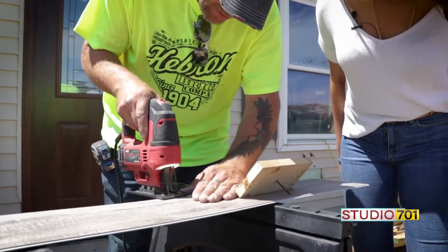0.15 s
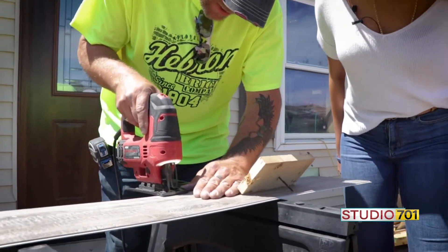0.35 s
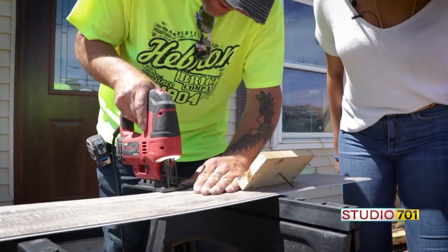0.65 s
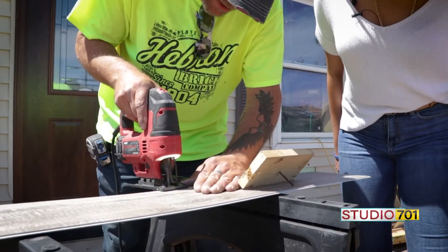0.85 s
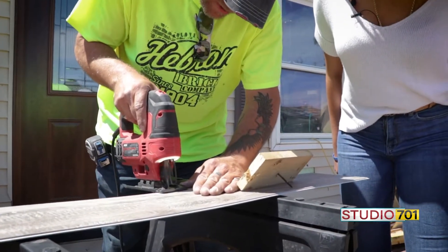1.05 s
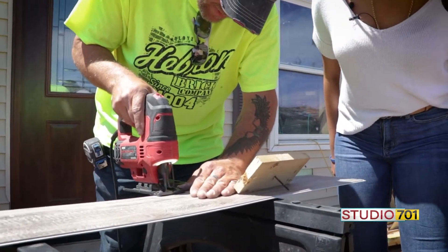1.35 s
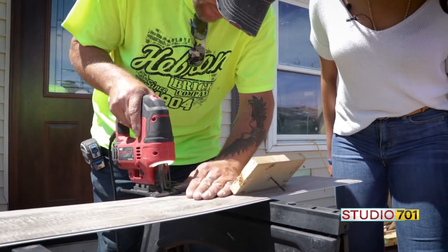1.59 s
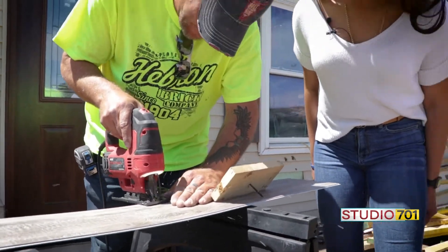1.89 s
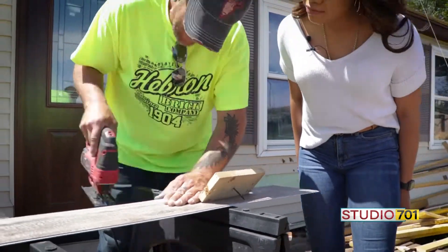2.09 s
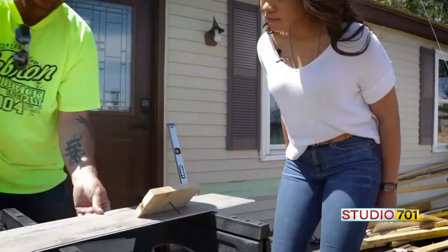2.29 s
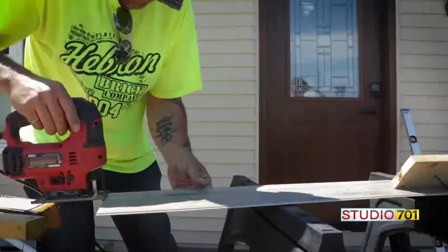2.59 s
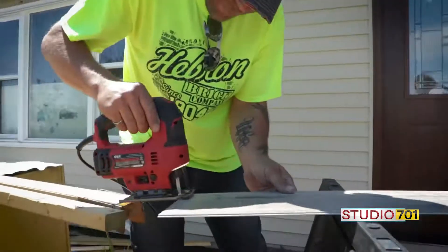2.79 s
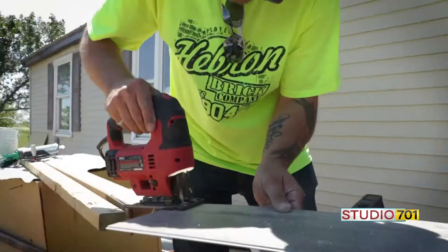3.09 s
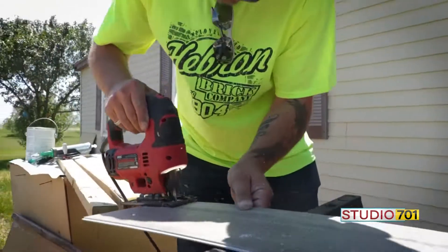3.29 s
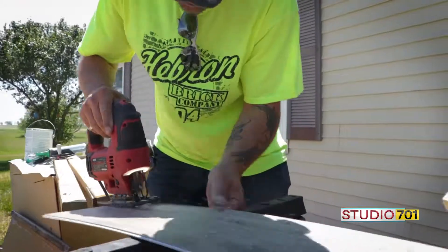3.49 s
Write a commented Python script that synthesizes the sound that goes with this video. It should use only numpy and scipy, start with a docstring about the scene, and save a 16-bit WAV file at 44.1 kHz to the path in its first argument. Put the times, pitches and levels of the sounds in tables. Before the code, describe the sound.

Jigsaw cutting flooring outdoors with a harsh buzzing rattle, a brief stop, then a whining restart

```python
"""A jigsaw rattles up to speed through a vinyl plank outdoors: knocks and rasp are shaped noise, with gear tones.
Abruptly it is heard running light, sine partials whining over throbbing fan noise, then braking with whistles.
Saw and plank are shifted about in noise bursts: dull knocks, gritty scrapes and sharp ticks.
The motor starts again, the blade catches the edge with a snap, and the plank knocks on its trestles.
Everything is close and mono over faint outdoor air."""
import sys
import numpy as np
from scipy import signal
from scipy.fft import rfft, irfft, next_fast_len
from scipy.io import wavfile
from scipy.ndimage import uniform_filter1d, map_coordinates

SR = 44100
rng = np.random.default_rng(int(sys.argv[2]) if len(sys.argv) > 2 else 0)


def wav_out(sig):
    """Save sig, one row per channel (or a flat mono array), as 16-bit PCM at SR to the path in sys.argv[1]."""
    wavfile.write(sys.argv[1], SR, np.round(np.clip(np.atleast_2d(sig).T, -1, 1) * 32767).astype(np.int16))


N = 160965
CUT_END_S = 1.77


def undb(db):
    """Decibels to gain."""
    return 10 ** (np.asarray(db) / 20)


def unit(x):
    """Scale to rms 1."""
    return x / np.sqrt(np.mean(x ** 2) + 1e-20)


def times():
    """Time of every sample in seconds."""
    return np.arange(N) / SR


def curve(table, axis=1):
    """One column of a table joined by straight lines in time."""
    rows = np.array(table, float)
    return np.interp(times(), rows[:, 0], rows[:, axis])


def noise():
    """White noise of rms 1."""
    return rng.standard_normal(N)


def walk(rate):
    """Smooth random drift of rms 1 that changes about rate times a second."""
    hold = max(int(SR / rate), 1)
    steps = np.repeat(noise()[:N // hold + 1], hold)
    smooth = uniform_filter1d(uniform_filter1d(steps, hold), hold // 2 + 1)
    return unit(smooth[:N])


def colour(x, points):
    """Minimum-phase filter with the given spectrum; white noise keeps its level."""
    rows, size = np.array(points, float), next_fast_len(N + 8192)
    hz = np.maximum(np.arange(size // 2 + 1) * SR / size, 1)
    gain = unit(undb(np.interp(np.log(hz), np.log(rows[:, 0]), rows[:, 1])))
    # folding the cepstrum onto positive time makes the filter causal
    cepstrum = irfft(np.log(gain), size)
    cepstrum[1:size // 2] *= 2
    cepstrum[size // 2 + 1:] = 0
    return irfft(rfft(x, size) * np.exp(rfft(cepstrum)), size)[:N]


def ring(x, hz, width_hz):
    """One resonance."""
    return signal.lfilter(*signal.iirpeak(hz, hz / width_hz, SR), x)


def swell(at_s, width_s, limit):
    """Bell-shaped rise and fall around one moment, with its exponent capped at limit."""
    return np.exp(-np.minimum(((times() - at_s) / width_s) ** 2, limit))


def turning(speed, wobble):
    """Turns made by the motor, whose speed wobbles slightly."""
    return np.cumsum(curve(speed) * (1 + wobble * walk(120))) / SR


def texture(cycles, repeat, size):
    """Contact noise, of which a share of the power comes back the same in every cycle."""
    same = map_coordinates(rng.standard_normal(size), [cycles % 1 * size], order=3, mode="grid-wrap")
    share = np.clip(repeat, 0, 1)
    return np.sqrt(share) * same + np.sqrt(1 - share) * noise()


def whine(turns, orders, flutter_db, blur):
    """Partials of a turning part, each fluttering on its own; the high ones are more blurred."""
    out = 0
    for order, db in orders:
        phase = order * turns + blur * order * walk(200) + rng.random()
        out = out + undb(db + flutter_db * walk(24.94)) * np.sin(2 * np.pi * phase)
    return unit(out)


def blows(table, decay_s):
    """Sudden onsets that die away exponentially."""
    t, out = times(), 0
    for at_s, db in table:
        out = out + undb(db) * (t >= at_s) * np.exp(-np.clip((t - at_s) / decay_s, 0, 20))
    return out


# Knocks of the plunger within one stroke: place (0-1 of a stroke), level_db (relative)
STROKE_KNOCKS = [(0.128, -4), (.31, -3.5), (.47, -10.5), (.63, -4), (0.769, -12.5), (0.981, -5)]
KNOCK_DECAY_S, KNOCK_SCATTER_DB = 0.00094, 1.3


def plunger_force(strokes, stroke_hz):
    """The plunger knocks several times a stroke, a little harder or softer each time."""
    force = 0.24  # steady contact between knocks
    for place, db in STROKE_KNOCKS:
        cycle = strokes - place + 2
        scatter = undb(db + KNOCK_SCATTER_DB * noise()[cycle.astype(int)])  # one draw a stroke
        since_s = (cycle % 1) / stroke_hz
        force = force + scatter * np.exp(-since_s / KNOCK_DECAY_S)
    return force


# Saw body spectrum: freq_hz, density_db (relative, per Hz)
BODY_COLOUR = [(30, -61), (70, -39), (100, -38), (140, -45), (300, -36), (500, -25), (720, -21),
               (1100, -32), (1220, -8), (1380, -9.5), (1580, -3), (2100, 0.5), (2550, -2.5), (2800, -0.5),
               (3150, 3), (3600, -1.5), (4200, -11.5), (8000, -33), (16000, -65)]


def body_rattle(force, strokes):
    """The knocks excite the saw body with noise that partly repeats each stroke."""
    return unit(colour(force * texture(strokes, repeat=0.36, size=800), BODY_COLOUR))


# Blade rasp spectrum: freq_hz, density_db (relative, per Hz)
RASP_COLOUR = [(200, -61.5), (1500, -5.5), (3500, -10.5), (4050, -7.5), (4450, -2), (4750, -2),
               (5200, -0.5), (5800, -5), (6300, -0.5), (7250, -4.5), (7750, 3.5), (8100, 2), (8600, -1.5),
               (9200, 1.5), (9900, -2), (10700, 2), (11300, -0.5), (12200, -4.5), (12800, -4.5),
               (14000, -11), (16000, -18)]


def blade_rasp(force, strokes):
    """The teeth rasp unevenly, less dependent on the knocks than the body is."""
    grit = undb(2 * walk(3000))  # 2 dB unevenness
    return unit(colour((force + 1.1) * grit * texture(strokes, repeat=0.15, size=840), RASP_COLOUR))


# Ringing of shoe and plank: freq_hz, half_width_hz (half the band of each filter), level_db (relative)
SHOE_MODES = [(779.4, 52.4, 1), (825, 51, 0), (899.6, 46, 1)]


def shoe_ringing(force, strokes):
    """The knocks ring shoe and plank, each mode a pair of resonances, with alternating sign."""
    push = force * texture(strokes, repeat=0.12, size=800)
    out = 0
    for k, (hz, half_width, db) in enumerate(SHOE_MODES):
        once = ring(push, hz, 2 * half_width)
        out = out + (-1) ** k * undb(db) * ring(once, hz, 2 * half_width)
    return unit(out)


# Gear whine in the cut: time_s, level_db
GEAR_LEVEL = [(0, -44.5), (.04, -52), (.1, -44.5), (.14, -37.5), (.19, -37.5), (.26, -40), (.36, -44),
              (.48, -42.5), (.6, -54), (1.77, -52)]
PINION_TEETH, GEAR_THROB, GEAR_BLUR_CYCLES = 5, .85, 0.14


def gear_whine(turns, strokes):
    """Pinion teeth mesh into a tone that throbs with the load, over a faint rotor hum."""
    load = 1 + GEAR_THROB * np.cos(4 * np.pi * strokes)  # heavier on each up and down stroke
    mesh = unit(load * np.sin(2 * np.pi * (PINION_TEETH * turns + GEAR_BLUR_CYCLES * walk(170))))
    hum = undb(-26) * np.sin(2 * np.pi * (turns + 0.14 * walk(60)))
    return (mesh + hum) * undb(curve(GEAR_LEVEL))


# Plunger buzz partials: order (multiple of the stroke rate), level_db (relative)
BUZZ_ORDERS = [(41, -0.5), (47, 0), (50, 1), (51, 0.5), (52, -2.5), (53, -1.5), (54, 1), (55, 1.5),
               (57, -4), (59, 0)]
# Build-up of the buzz: time_s, level_db
BUZZ_LEVEL = [(0, -80), (.45, -59), (.75, -43), (1.3, -41.5), (1.77, -39.5)]


def plunger_buzz(strokes):
    """High partials of the stroke rate build up at full speed."""
    return whine(strokes, BUZZ_ORDERS, flutter_db=2.5, blur=0.0013) * undb(curve(BUZZ_LEVEL))


# Motor speed while cutting: time_s, speed_turns_per_s
CUT_SPEED = [(0, 290), (.03, 283), (.07, 359), (.13, 406), (.22, 437), (.34, 482), (.5, 488), (.9, 490),
             (1.3, 494), (1.77, 492)]
# Mix of the cut: time_s, rattle_db, rasp_db, shoe_db
CUT_LEVEL = [(0, -42.5, -56.5, -54), (.05, -41.5, -48, -55.5), (.11, -40.5, -45, -51),
             (.2, -39.5, -41.5, -49), (.4, -36.5, -39, -49.5), (.58, -36, -37.5, -49), (.64, -36, -39, -51),
             (.8, -36, -37.5, -49), (1.3, -37, -36.5, -50.5), (1.77, -37, -36.5, -48.5)]
GEAR_RATIO = 9.4  # motor turns per stroke


def cutting():
    """The geared motor drives the plunger: rattle, rasp, ringing, gear whine and buzz stop together."""
    turns = turning(CUT_SPEED, wobble=.002)
    strokes, stroke_hz = turns / GEAR_RATIO, curve(CUT_SPEED) / GEAR_RATIO
    force = plunger_force(strokes, stroke_hz)
    saw = body_rattle(force, strokes) * undb(curve(CUT_LEVEL))
    saw = saw + blade_rasp(force, strokes) * undb(curve(CUT_LEVEL, axis=2))
    saw = saw + shoe_ringing(force, strokes) * undb(curve(CUT_LEVEL, axis=3))
    saw = saw + gear_whine(turns, strokes) + plunger_buzz(strokes)
    return saw * (times() < CUT_END_S)


# Outdoor air spectrum: freq_hz, density_db (relative, per Hz)
AIR_COLOUR = [(30, -25), (100, -22), (220, 1), (700, 3.5), (1500, -1), (4000, -1), (16000, -5)]


def outdoor_air():
    """A faint, steady bed of coloured noise."""
    return undb(-74) * colour(noise(), AIR_COLOUR)


def fan(turns, spectrum, throb, grit_db):
    """Hiss of fan and brushes that throbs once a turn."""
    pulse = 1 + throb * np.sin(2 * np.pi * turns)
    return colour(unit(noise() * pulse * undb(grit_db * walk(2500))), spectrum)


# Motor speed running light: time_s, speed_turns_per_s
LIGHT_SPEED = [(1.77, 523), (1.83, 522.5), (1.88, 519), (1.94, 513), (2.0, 513.3), (2.085, 514),
               (2.12, 420), (2.18, 286), (2.2, 260), (2.25, 172), (2.38, 20)]
# Fan spectrum running light: freq_hz, density_db (relative, per Hz)
LIGHT_FAN = [(60, -55), (250, -35), (1400, -29.5), (2500, -17), (4000, -10.5), (6000, -6), (7500, -1.5),
             (8800, -3.5), (10500, -4.5), (13000, -1.5), (16000, -5)]
# Motor partials running light: order (multiple of the turn rate), level_db (relative)
LIGHT_ORDERS = [(1, -30.5), (2, -18.5), (3, -26), (4, -13.5), (5, -13), (6, -11.5), (7, -10.5), (8, -8),
                (9, -10), (10, -9), (11, -5), (13, -1.5), (14, 1), (15, 4.5), (16, 1), (17, 3.5),
                (19, -0.5), (20, -3), (21, 2.5), (22, -9), (23, -2), (24, -6), (25, -3), (26, -4), (27, 0),
                (28, -3), (29, -3), (30, -2)]
# Mix running light: time_s, fan_db, whine_db
LIGHT_LEVEL = [(1.77, -38.5, -41), (1.86, -37.5, -39.5), (2.0, -36, -39), (2.08, -37, -37.5),
               (2.11, -39, -44), (2.15, -45, -77), (2.25, -52, -76), (2.35, -59.5, -93), (2.385, -80, -110)]
MOTOR_STOP_S = 2.39


def running_light():
    """The unloaded motor whines over its fan, then brakes to a stop with falling whistles."""
    t, turns = times(), turning(LIGHT_SPEED, wobble=0.00074)
    hiss = fan(turns, LIGHT_FAN, throb=.1, grit_db=2.0) * undb(curve(LIGHT_LEVEL))
    tone = whine(turns, LIGHT_ORDERS, flutter_db=2.0, blur=.001) * undb(curve(LIGHT_LEVEL, axis=2))
    motor = hiss + tone + singing(turns) + brake_whistles(curve(LIGHT_SPEED))
    return motor * (t >= CUT_END_S) * (t < MOTOR_STOP_S)


# Blade singing on single motor partials: peak_s, width_s, order (multiple of the turn rate), level_db
SINGING = [(1.99, .075, 5, -52), (1.99, .085, 8, -52), (2.86, .1, 1, -78), (3.04, .1, 5, -51),
           (3.0, .05, 3, -64), (3.33, .06, 12, -51), (3.345, .05, 13, -46), (3.33, .06, 14, -52),
           (3.39, .07, 8, -53), (3.44, .07, 9, -54)]


def singing(turns):
    """Single motor partials swell where the blade resonates."""
    out = 0
    for at_s, width_s, order, db in SINGING:
        tone = np.sqrt(2) * np.sin(2 * np.pi * round(order) * turns)  # rms 1
        out = out + undb(db) * swell(at_s, width_s, limit=30) * tone
    return out


# Braking whistles: order (multiple of the turn rate), roughness (fraction of pitch),
# peak_s, width_s, level_db (peak)
BRAKE_WHISTLES = [(5.4, .02, 2.105, .014, -54), (10, .025, 2.125, .055, -57), (50, .028, 2.19, .022, -49.5),
                  (50, .035, 2.25, .03, -58)]


def brake_whistles(speed):
    """Rough tones follow the falling motor speed."""
    out = 0
    for order, rough, at_s, width_s, db in BRAKE_WHISTLES:
        phase = np.cumsum(order * speed * (1 + rough * walk(1200))) / SR
        audible = order * speed < SR / 2  # mute above half the sample rate
        out = out + undb(db) * swell(at_s, width_s, limit=30) * np.sin(2 * np.pi * phase) * audible
    return out


# Dull knocks of the plank: start_s, level_db (at onset, before colouring)
PLANK_KNOCKS = [(2.262, -60), (2.433, -57), (2.446, -61), (2.481, -54), (2.558, -57.5), (2.615, -62.5),
                (2.666, -64.5), (3.076, -50.5), (3.208, -48.5), (3.245, -48), (3.286, -54), (3.318, -44),
                (3.352, -50), (3.377, -47), (3.389, -48), (3.436, -56), (3.514, -49), (3.53, -55),
                (3.588, -49.5), (3.599, -46)]
# Plank spectrum: freq_hz, density_db (relative, per Hz)
PLANK_COLOUR = [(40, -40), (130, -18), (300, -4), (500, 0.5), (1000, -1.5), (1500, -7.5), (2500, -30),
                (8000, -65)]


def plank_knocks():
    """Dull noise bursts with a short thud and a softer, longer tail."""
    thud = blows(PLANK_KNOCKS, decay_s=0.002)
    tail = undb(-13.5) * blows(PLANK_KNOCKS, decay_s=0.02)
    return colour((thud + tail) * noise(), PLANK_COLOUR)


# Scrapes of shoe and blade on the plank: peak_s, width_s, body_db, treble_db
SCRAPES = [(2.326, 0.0057, -55.5, -75), (2.348, 0.014, -52.5, -61), (2.422, 0.0043, -55.5, -53.5),
           (2.436, 0.0054, -60, -63), (2.447, 0.0061, -55, -63), (2.487, 0.0076, -64, -68),
           (2.565, 0.016, -53, -48.5), (2.975, 0.011, -42.5, -40), (3.0, 0.0085, -41.5, -39),
           (3.075, 0.013, -47, -57), (3.102, 0.0064, -47.5, -54), (3.42, 0.0057, -49, -39),
           (3.538, .007, -50.5, -39.5)]
# Scrape body spectrum: freq_hz, density_db (relative, per Hz)
SCRAPE_BODY = [(100, -52), (500, -14), (1000, -9.5), (1500, -2), (3500, 3.5), (5500, -2), (9000, -17),
               (16000, -35)]
# Scrape treble spectrum: freq_hz, density_db (relative, per Hz)
SCRAPE_TREBLE = [(300, -37), (2500, -20), (5000, -3), (8000, 3.5), (12000, -3.5), (16000, -7)]


def scraping(grit_db):
    """Short gritty rubs of noise, each with its own share of treble."""
    body, treble = 0, 0
    for at_s, width_s, body_db, treble_db in SCRAPES:
        rub = swell(at_s, width_s, limit=20)
        body = body + undb(body_db) * rub
        treble = treble + undb(treble_db) * rub
    grit = unit(undb(grit_db * walk(1200)))
    return colour(body * grit * noise(), SCRAPE_BODY) + colour(treble * grit * noise(), SCRAPE_TREBLE)


# Sharp ticks of the trigger and blade: start_s, level_db (at onset, before colouring)
TICKS = [(2.3462, -52), (2.394, -49), (2.4885, -49), (2.517, -63), (2.6345, -50.5), (2.680, -52.5),
         (2.754, -39), (2.882, -41), (2.9705, -28), (2.974, -20), (2.9762, -30)]
# Tick spectrum: freq_hz, density_db (relative, per Hz)
TICK_COLOUR = [(100, -53), (1500, -16), (2800, 0.5), (5000, -3), (8000, -1), (16000, -3)]
SNAP_S, SNAP_DB = 2.9762, -7  # impulse peak before colouring


def ticks_and_snap():
    """Brief noise bursts tick; a one-sample impulse is a tooth snapping against the edge."""
    snap = undb(SNAP_DB) * (np.arange(N) == int(SNAP_S * SR))
    return colour(blows(TICKS, decay_s=0.00085) * noise() + snap, TICK_COLOUR)


# Motor speed after the restart: time_s, speed_turns_per_s
RESTART_SPEED = [(2.753, 250), (2.775, 408), (2.8, 482.5), (2.842, 512.3), (2.898, 526.7), (3.004, 513),
                 (3.25, 508.8), (3.518, 510.8), (3.538, 498), (3.56, 516), (3.65, 509)]
# Fan spectrum after the restart: freq_hz, density_db (relative, per Hz)
RESTART_FAN = [(60, -62), (250, -39), (1000, -26.5), (1800, -18), (3000, -6), (5000, -3), (7500, 1),
               (11000, 1.5), (16000, -0.5)]
# Motor partials after the restart: order (multiple of the turn rate), level_db (relative)
RESTART_ORDERS = [(1, -18.5), (2, -12.5), (3, -14), (4, -12), (5, 0.5), (6, -6.5), (7, -4.5), (8, -1.5),
                  (9, -8.5), (10, 2), (11, -4), (12, -6), (13, -5), (14, -6), (15, -4), (16, -10), (17, -6),
                  (18, 2), (19, -9), (20, -6), (21, -7), (22, -4), (23, -12), (24, -9), (25, -5), (26, -7),
                  (27, 2), (28, -9), (29, 4.5), (30, -4)]
# Mix after the restart: time_s, fan_db, whine_db
RESTART_LEVEL = [(2.753, -48.5, -84), (2.785, -44, -79), (2.87, -41.5, -53.5), (2.96, -43, -45.5),
                 (3.05, -41.5, -46), (3.24, -42, -42.5), (3.41, -39.5, -43.5), (3.5, -41, -44.5),
                 (3.53, -42, -51), (3.58, -43, -46), (3.65, -41.5, -52)]
RESTART_S, RESTART_ATTACK_S = 2.747, 0.011


def restart():
    """The motor spins up again and the blade sings as it nears the plank."""
    turns = turning(RESTART_SPEED, wobble=.001)
    hiss = fan(turns, RESTART_FAN, throb=0.11, grit_db=1.5) * undb(curve(RESTART_LEVEL))
    tone = whine(turns, RESTART_ORDERS, flutter_db=2.5, blur=.0015) * undb(curve(RESTART_LEVEL, axis=2))
    fade_in = np.clip((times() - RESTART_S) / RESTART_ATTACK_S, 0, 1)
    return (hiss + tone + singing(turns)) * fade_in


def scene():
    """Saw, plank and faint outdoor air, the same in both channels."""
    mono = cutting() + outdoor_air() + running_light()
    mono = mono + plank_knocks() + scraping(grit_db=3) + ticks_and_snap() + restart()
    return np.array([mono, mono])


def record(dry):
    """The recorder cuts the top steeply above 15.8 kHz."""
    lowpass = signal.ellip(12, .1, 80, 15800, fs=SR, output="sos")  # 0.1 dB ripple, 80 dB stopband
    return signal.sosfilt(lowpass, dry)


dry = scene()
out = record(dry)
wav_out(out)
```